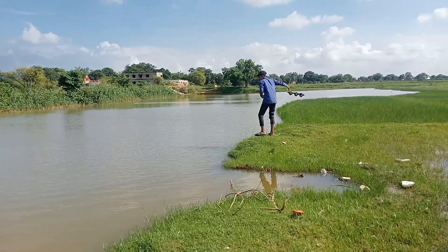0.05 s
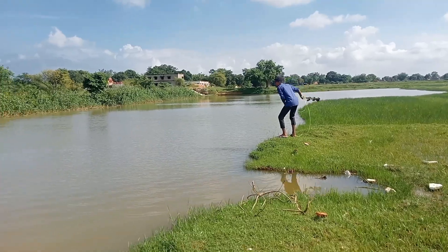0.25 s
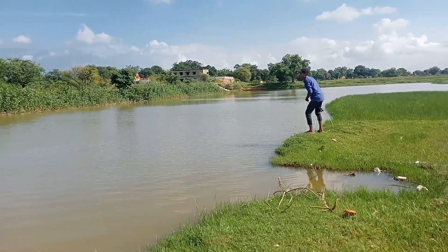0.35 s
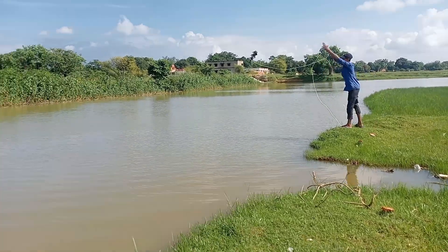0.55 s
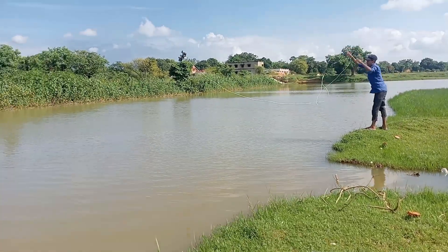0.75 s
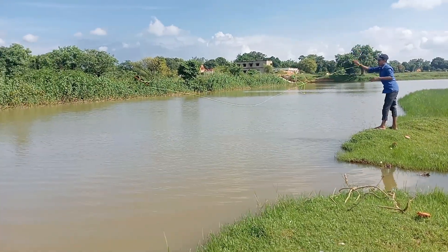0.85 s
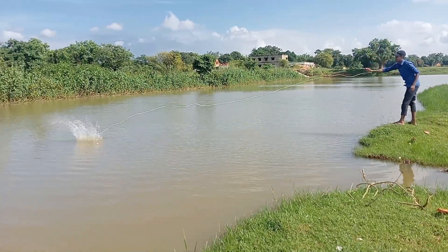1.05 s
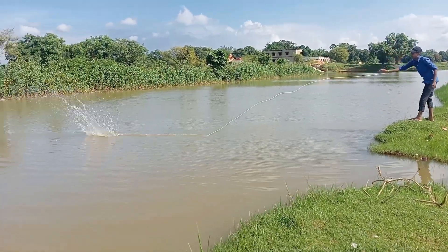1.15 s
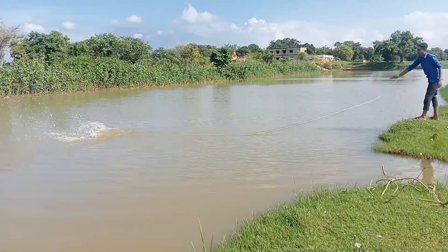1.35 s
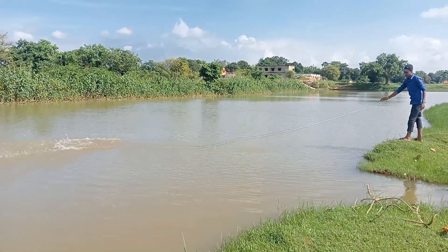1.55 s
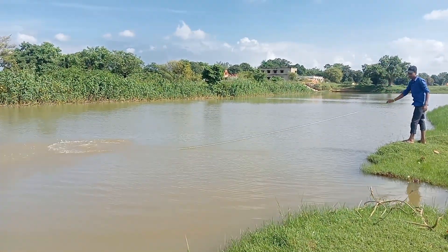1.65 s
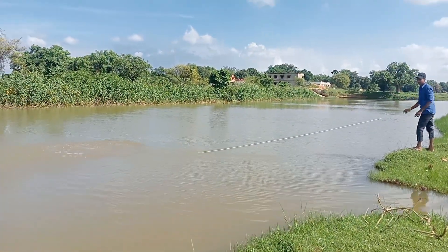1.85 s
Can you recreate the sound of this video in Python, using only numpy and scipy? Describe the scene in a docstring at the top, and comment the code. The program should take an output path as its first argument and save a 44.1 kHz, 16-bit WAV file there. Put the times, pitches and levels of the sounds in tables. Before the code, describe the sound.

A thrown weight splashes into a pond while wind buffets the microphone.

```python
"""Pondside in open country, wind buffeting the microphone. A weight on a rope is swung with a faint
whir, the rope swishes out, and a bird whistles far off. Just after a second the weight smacks the
water, its cavity closes with a plop, and the thrown-up spray patters back, ringing small bubbles.
Foam fizzes; near the end the sound cuts out for an instant, then come the last drips and distant
peeps over a duller hiss."""
import sys
import numpy as np
from scipy import signal
from scipy.fft import rfft, irfft
from scipy.io import wavfile
from scipy.ndimage import uniform_filter1d

SR = 44100
rng = np.random.default_rng(int(sys.argv[2]) if len(sys.argv) > 2 else 0)


def master(y):
    """Save y as 16-bit WAV."""
    cut = np.clip(np.atleast_2d(y).T, -1, 1)
    pcm = np.round(cut * 32767)  # scale
    wavfile.write(sys.argv[1], SR, pcm.astype(np.int16))


N = 83790
T = np.arange(N) / SR
FREQS = np.maximum(np.fft.rfftfreq(N, 1 / SR), 1)

# hiss of open country, before and after the dropout: f/Hz, level/dB
AIR_COLOUR = [(410, -21.5), (700, 2.5), (1180, -5), (1690, -1.5), (2430, -12), (2590, -9), (4830, -12.5),
              (7310, -19), (10500, -31.5), (13300, -30.5), (15500, -44)]
DULL_AIR_COLOUR = [(700, 5), (1500, -4), (3800, -5), (4700, -30), (7000, -28), (9000, -22), (15000, -30)]
AIR_DB, DULL_AIR_DB = -67.5, -70

# a bird far off, one contour per whistle: t/s, f/Hz, level/dB
BIRD_WHISTLES = [
    [(.655, 5600, -85), (.672, 7300, -64), (.684, 6000, -66), (.695, 5000, -89)],
    [(.725, 7150, -82), (.738, 7250, -73), (.757, 7450, -70), (.78, 6000, -65.5), (.82, 5500, -75),
     (.848, 4600, -65.5), (.865, 4300, -88)],
]
# its short falling peeps: t/s, f/Hz, level/dB
BIRD_PEEPS = [(1.771, 7060, -73), (1.820, 7200, -74), (1.832, 6820, -76), (1.875, 7000, -66)]
# trains of very high chirps: first chirp t/s, level/dB
CHIRP_TRAINS = [(.075, -76), (.287, -70), (.479, -71), (.702, -71), (.924, -72.5), (1.158, -75),
                (1.593, -65)]
CHIRP_GAP_S, CHIRP_HZ = .015, 13550

# eddies hitting the microphone: middle t/s, width/s, level/dB, brightness f/Hz
EDDIES = [(0.034, 0.0094, -52, 150), (0.049, 0.0048, -36.5, 130), (0.189, 0.012, -40.5, 152),
          (0.205, 0.0068, -27.5, 172), (0.218, 0.0065, -30, 130), (.246, 0.011, -20, 224),
          (0.26, 0.0088, -21, 130), (0.276, 0.0039, -30, 160), (.288, 0.015, -16.5, 301),
          (0.321, 0.012, -23.5, 150), (0.335, 0.01, -24, 200), (0.353, 0.0097, -26.5, 130),
          (0.393, .007, -27, 170), (.416, 0.0064, -21.5, 130), (0.434, 0.027, -33.5, 170),
          (.476, 0.009, -48.5, 120), (0.501, 0.0027, -39.5, 130), (.583, 0.018, -39, 160),
          (.648, 0.034, -47, 120), (0.716, .006, -40, 100), (.738, 0.013, -37, 130),
          (0.758, 0.019, -37.5, 120), (0.795, 0.012, -26, 110), (0.808, 0.0053, -24.5, 140),
          (0.827, 0.011, -27.5, 120), (.845, .009, -36.5, 110), (0.875, 0.0072, -17.5, 204),
          (0.884, 0.0042, -25.5, 150), (0.904, 0.0061, -37.5, 130), (0.947, 0.0049, -37.5, 110),
          (0.981, 0.008, -27.5, 110), (1.002, 0.0048, -27, 200), (1.008, 0.0051, -20, 170),
          (1.031, .010, -39, 200), (1.070, 0.0062, -37.5, 110), (1.164, 0.012, -35, 200),
          (1.180, 0.0034, -32, 220), (1.262, 0.024, -50, 120), (1.494, 0.0052, -27.5, 105),
          (1.513, 0.0056, -35.5, 130), (1.593, 0.006, -43, 130), (1.645, 0.028, -43.5, 130),
          (1.711, 0.013, -40, 60), (1.873, 0.016, -36.5, 74)]
# steady wind between them: t/s, level/dB
BREEZE_LEVELS = [(0, -42.5), (.15, -55), (.3, -32.5), (.45, -42), (.55, -53.5), (.63, -54), (.8, -44.5),
                 (.92, -65), (1.02, -48.5), (1.12, -53), (1.25, -57.5), (1.35, -61.5), (1.5, -57),
                 (1.7, -54.5), (1.81, -62.5), (1.9, -55.5)]
# colour of wind at the microphone's port: f/Hz, level/dB
PORT_COLOUR = [(30, 0), (130, -2.5), (200, -1), (300, 0.5), (450, -1), (620, 2.5), (800, 0), (1200, 1.5),
               (2000, -5.5)]
BREEZE_HZ, BREEZE_FLUTTER_DB = 122, 2  # brightness, depth of the flutter
PORT_HZ, PORT_ORDER, PORT_LEAK_DB = 149.4, 5.09, -39  # microphone's bass loss: corner, steepness, leak
SLOW_EDDY_HZ = 103  # eddies duller than this reach deeper into the bass
EDGE_DB, EDGE_HZ = -62.5, 2070  # faint crisp edge of the eddies
WAKE_S, WAKE_DB, WAKE_HZ = .018, -18.5, 150  # turbulence around each eddy: decay, level, brightness

# the rope on the backswing: f/Hz, level/dB
ROPE_WHIR_COLOUR = [(1500, -6), (3500, 0), (5000, -3), (7500, -12), (10000, -28)]
# the rope paying out: middle t/s, width/s, level/dB, treble tilt/(dB per octave)
ROPE_SWISHES = [(0.475, 0.0077, -58.5, 3), (.485, 0.0078, -53, 1.5), (.606, 0.0025, -55.5, -11)]
# colour of those swishes: f/Hz, level/dB
SWISH_COLOUR = [(1500, -30), (2800, -13), (3600, -4), (5000, 3.5), (7500, -2), (9000, -12), (12000, -31),
                (15000, -42)]

# water falling back on the pond: t/s, fine spray level/dB, heavy drops level/dB
FALLING_WATER = [(1.071, -70, -48), (1.088, -66, -47.5), (1.14, -57, -55), (1.211, -60, -58.5),
                 (1.26, -51.5, -56.5), (1.34, -48.5, -60), (1.409, -51, -60), (1.459, -48.5, -49),
                 (1.52, -49.5, -55.5), (1.591, -56.5, -60.5), (1.657, -62.5, -60), (1.687, -76, -64),
                 (1.78, -86, -72.5), (1.9, -98.5, -82)]
# colours of foam, fine spray and heavy drops: f/Hz, level/dB
FOAM_COLOUR = [(5000, -30), (7500, -6), (9500, -3), (15000, -6.5)]
FINE_COLOUR = [(1180, -42), (2000, -8.5), (2350, -14), (2700, -6.5), (3180, -2.5), (5360, -3), (6580, -9.5),
               (7230, -7), (8960, -23), (13100, -24), (15500, -43.5)]
HEAVY_COLOUR = [(400, -18), (550, -9), (780, -5), (1050, -13), (1550, 2.5), (2300, -4), (3200, -2.5),
                (4500, -30.5), (8000, -24.5)]
CRACKLE_DB = -8.5  # distinct droplets, relative to the fine spray

# blows on the water: t/s, level/dB, decay/s, relative tail level/dB, treble tilt/(dB per octave)
WATER_BLOWS = [(1.0718, -20.5, 0.0039, -16.5, 1), (1.1745, -38.5, 0.0048, -25, -10),
               (1.178, -36, 0.0073, -12.5, -7), (1.2362, -35, 0.0022, -22, -2.5),
               (1.3365, -40, .002, -21, 2), (1.4570, -46, 0.0014, -6, -2),
               (1.531, -48.5, 0.0039, -4.5, -20), (1.593, -45.5, 0.0046, -30, -7.5),
               (1.727, -64, 0.0029, -19, -13)]
# colour of a blow: f/Hz, level/dB
BLOW_COLOUR = [(240, -46), (400, -4.5), (1030, -19), (1880, -3), (2470, -20), (2880, -0.5), (3300, 0),
               (3680, -0.5), (5000, 3), (5390, -2), (6480, -1), (7550, -5.5), (8150, -13), (8930, -17),
               (15500, -36)]
BLOW_RISE_S, TAIL_DECAY_S, TAIL_DB_PER_OCTAVE = 0.0012, 0.015, -5
# air pockets rung by the first smack: f/Hz, level/dB, decay/s
AIR_POCKETS = [(1540, -44, .012), (4810, -31.5, 0.005), (4990, -32, 0.0058), (7930, -29.5, 0.0028)]
# single larger bubbles: t/s, f/Hz, level/dB, decay/s
LARGE_BUBBLES = [(1.179, 1613, -42.5, .005), (1.458, 2890, -30, 0.0018), (1.496, 1526, -47.5, 0.011),
                 (1.719, 1345, -57, 0.0029), (1.728, 2600, -49, .003), (1.732, 2110, -51, .006),
                 (1.764, 2270, -55, 0.0031), (1.801, 1400, -55.5, 0.0025)]
BUBBLE_RISE_PER_S = 6.1  # pitch climb, relative to the starting pitch

DROPOUT_S, DROPOUT_END_S, DROPOUT_DB = 1.662, 1.679, -29.5
TOP_HZ = 15500


def undb(db):
    """Decibels to gain."""
    return 10 ** (np.asarray(db) / 20)


def unit(x):
    """Scale to rms 1."""
    return x / np.sqrt(np.mean(x ** 2) + 1e-30)


def shade(x, gain):
    """Filter by a gain per frequency; rms 1."""
    return unit(irfft(rfft(x) * gain, N))


def noise(gain):
    """Coloured noise, rms 1."""
    return shade(rng.standard_normal(N), gain)


def colour(points, tilt_db=0):
    """Gain per frequency from f/Hz, level/dB points and a tilt per octave, fading below the first."""
    hz, db = np.array(points, float).T
    curve_db = np.interp(np.log(FREQS), np.log(hz), db)
    octaves = np.log2(np.maximum(FREQS, 1500) / 4000)
    return undb(curve_db + tilt_db * octaves) / (1 + (.6 * hz[0] / FREQS) ** 4)


def bell(at, width):
    """A smooth swell with the given width at half height."""
    return .5 ** np.minimum((2 * (T - at) / width) ** 2, 200)


def burst(x, env):
    """Noise under an envelope, with the energy of that envelope."""
    return x * env * np.sqrt(np.sum(env ** 2) / (np.sum((x * env) ** 2) + 1e-30))


def wander(rate_hz):
    """Random drift up to about the given rate, rms 1."""
    return noise(1 / (1 + (FREQS / rate_hz) ** 4))


def open_air():
    """Faint, gently wavering hiss of the country around the pond, duller after the dropout."""
    early = undb(AIR_DB) * noise(colour(AIR_COLOUR))
    late = undb(DULL_AIR_DB) * noise(colour(DULL_AIR_COLOUR))
    return np.where(T < DROPOUT_END_S, early, late) * undb(1.3 * wander(3.7))


def chirp(at, hz, width_s, fall_hz_per_s):
    """A short tone falling through the given pitch."""
    age = T - at
    return bell(at, width_s) * np.sin(2 * np.pi * age * (hz - fall_hz_per_s * age / 2))


def wildlife():
    """Far from the microphone: thin whistles and peeps, and very high chirps in threes."""
    out = np.zeros(N)
    for whistle in BIRD_WHISTLES:
        at, hz, db = np.array(whistle).T
        pitch = np.interp(T, at, hz) * (1 + 0.022 * wander(400))
        level = undb(np.interp(T, at, db)) * (T > at[0]) * (T < at[-1])
        out += level * np.sin(2 * np.pi * np.cumsum(pitch) / SR)
    for at, hz, db in BIRD_PEEPS:
        out += undb(db) * chirp(at, hz, width_s=0.0062, fall_hz_per_s=80000)
    for first, db in CHIRP_TRAINS:
        for k, (loud, high) in enumerate(rng.standard_normal((3, 2))):
            at, hz = first + k * CHIRP_GAP_S, CHIRP_HZ * (1 + .012 * high)
            out += undb(db + 1.5 * loud) * chirp(at, hz, width_s=.0045, fall_hz_per_s=190000)
    return out


def turbulence(bright_hz, freqs):
    """Spectrum of wind on the port: little deep bass, a treble that dies away faster in slow eddies."""
    corner = PORT_HZ * min(1, bright_hz / SLOW_EDDY_HZ)
    treble = np.exp(-freqs / bright_hz) + undb(EDGE_DB) / (1 + (freqs / EDGE_HZ) ** 4)
    bass_cut = 1 / np.sqrt(1 + (corner / freqs) ** (2 * PORT_ORDER))
    return treble * (bass_cut + undb(PORT_LEAK_DB))


def eddy(width, bright_hz, port, size=8192):
    """One short puff of pressure on the microphone, centred in its span."""
    freqs = np.maximum(np.fft.rfftfreq(size, 1 / SR), 1)
    swell = bell(T[size // 2], width)[:size]
    gain = np.interp(freqs, FREQS, port) * turbulence(bright_hz, freqs)
    spectrum = rfft(rng.standard_normal(size) * swell)
    puff = irfft(gain * spectrum / np.sqrt(np.abs(spectrum) + 1e-9))  # evens out chance peaks
    return unit(puff * swell ** (1 / 4)) * np.sqrt(np.mean(swell ** 2) / 2)


def wind():
    """Right on the microphone: short eddies, each with a wake, over a fluttering breeze."""
    port = colour(PORT_COLOUR)
    flutter = undb(BREEZE_FLUTTER_DB * wander(36))
    breeze = unit(noise(port * turbulence(BREEZE_HZ, FREQS)) * flutter)
    out = breeze * undb(np.interp(T, *np.array(BREEZE_LEVELS).T))
    wake_power = np.zeros(N)
    for at, width, db, hz in EDDIES:
        puff = eddy(width, hz, port)
        puff_times = at + T[:len(puff)] - T[len(puff) // 2]
        out += undb(db) * np.interp(T, puff_times, puff, left=0, right=0)
        wake_power += undb(db) ** 2 / 2 * np.exp(-2 * np.abs(T - at - width / 2) / WAKE_S)
    return out + undb(WAKE_DB) * np.sqrt(wake_power) * noise(port * turbulence(WAKE_HZ, FREQS))


def rope():
    """The rope whirs faintly on the backswing and swishes as it runs out."""
    out = undb(-75) * bell(at=.12, width=.16) * noise(colour(ROPE_WHIR_COLOUR))
    for at, width, db, tilt_db in ROPE_SWISHES:
        out += undb(db) * bell(at, width) * noise(colour(SWISH_COLOUR, tilt_db))
    return out


def add_bubble(out, at, hz, gain, decay):
    """Trapped air rings: a dying sine whose pitch creeps upward."""
    start = int(at * SR)
    t = T[:max(0, min(int(6 * decay * SR), N - start))]
    phase = 2 * np.pi * hz * t * (1 + BUBBLE_RISE_PER_S * t / 2)
    out[start:start + len(t)] += gain * np.exp(-t / decay) * np.sin(phase)


def patter(points, low_hz, high_hz, cycles, scatter_db, click, count):
    """Random droplets: each ticks on the surface and rings a tiny bubble; rms 1."""
    rings, ticks = np.zeros(N), np.zeros(N)
    for when, pitch, size, sustain in rng.random((count, 4)):
        hz = low_hz * (high_hz / low_hz) ** pitch
        gain = undb(scatter_db * min(-np.log(1 - size), 4))  # many quiet, a few loud
        add_bubble(rings, when * T[-1], hz, gain, decay=cycles * (.5 + sustain) / hz)
        ticks[int(when * (N - 1))] += gain * np.sign(sustain - .5)
    return unit(shade(rings, colour(points)) + click * shade(ticks, colour(points)))


def foam():
    """Thin ticks of foam bursting as the pond settles."""
    ticks = patter(FOAM_COLOUR, low_hz=9000, high_hz=14000, cycles=1.5, scatter_db=2.5, click=1,
                   count=600)
    return undb(-72.5) * ticks * bell(at=1.705, width=.22)


def spray():
    """Fine spray rains back on the pond with a crackle of droplets; the heavier drops last longest."""
    at, fine_db, heavy_db = np.array(FALLING_WATER).T
    fine = patter(FINE_COLOUR, low_hz=2500, high_hz=9000, cycles=5, scatter_db=3.5, click=.9, count=4000)
    crackle = patter(FINE_COLOUR, low_hz=2800, high_hz=7500, cycles=5, scatter_db=2.5, click=1,
                     count=240)
    heavy = patter(HEAVY_COLOUR, low_hz=612, high_hz=3800, cycles=4.7, scatter_db=1.5, click=.58,
                   count=2200)
    fine_fall = (fine + undb(CRACKLE_DB) * crackle) * undb(np.interp(T, at, fine_db))
    heavy_fall = heavy * undb(np.interp(T, at, heavy_db))
    return (fine_fall + heavy_fall) * (T > at[0])


def splash():
    """The weight's smack, the closing cavity and falling sheets of water: cracks, tails, ringing air."""
    out = np.zeros(N)
    for at, db, decay, tail_db, tilt_db in WATER_BLOWS:
        age = np.maximum(T - at, 0)
        rise = np.minimum(age / BLOW_RISE_S, 1)
        crack = burst(noise(colour(BLOW_COLOUR, tilt_db)), rise * np.exp(-age / decay))
        tail_colour = colour(BLOW_COLOUR, tilt_db / 2 + TAIL_DB_PER_OCTAVE)
        tail = burst(noise(tail_colour), rise * np.exp(-age / TAIL_DECAY_S))
        out += undb(db) * (crack + undb(tail_db) * tail)
    smack_s = WATER_BLOWS[0][0]
    for hz, db, decay in AIR_POCKETS:
        add_bubble(out, smack_s, hz, undb(db), decay)
    for at, hz, db, decay in LARGE_BUBBLES:
        add_bubble(out, at, hz, undb(db), decay)
    return out


def scene():
    """Open country, wind, throw and splash at one microphone by the pond."""
    return (open_air() + wildlife() + wind() + rope() + foam() + spray() + splash())[None]


def record(dry):
    """The sound cuts out for an instant, and the microphone loses its very top."""
    in_dropout = (T > DROPOUT_S) & (T < DROPOUT_END_S)
    gate = uniform_filter1d(np.where(in_dropout, undb(DROPOUT_DB), 1.), size=40)
    lowpass = signal.ellip(8, .2, 70, TOP_HZ, fs=SR, output="sos")
    return signal.sosfilt(lowpass, dry * gate)


dry = scene()
out = record(dry)
master(out)
```